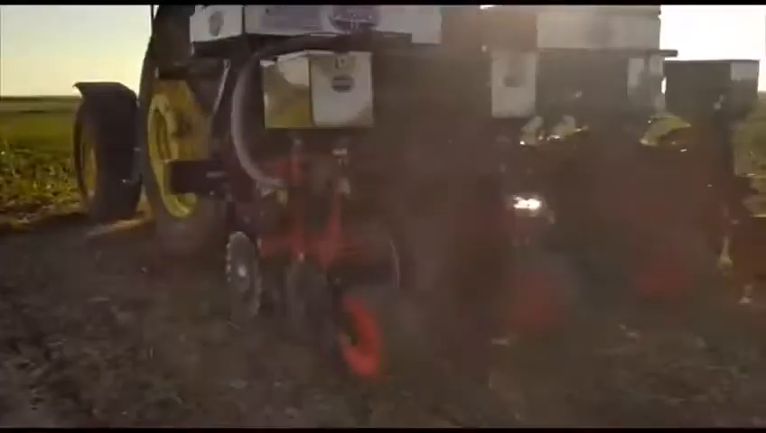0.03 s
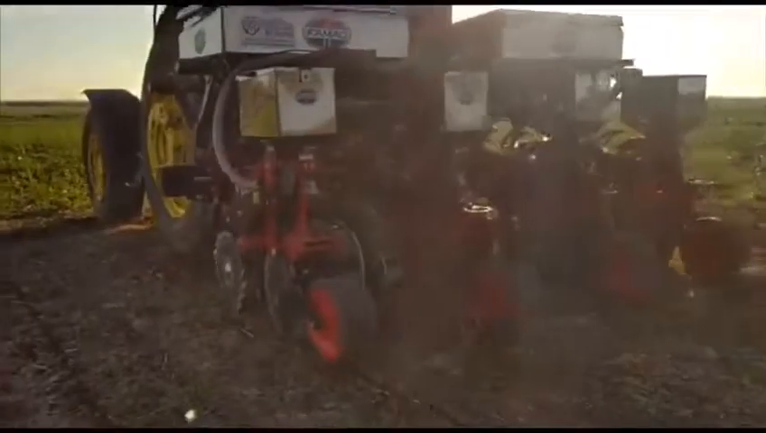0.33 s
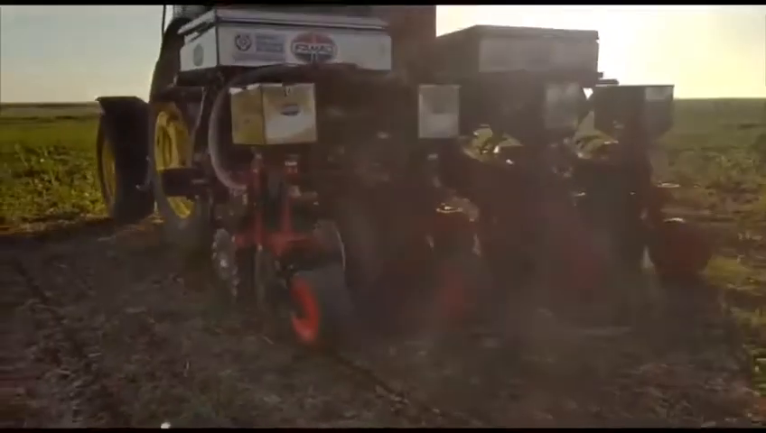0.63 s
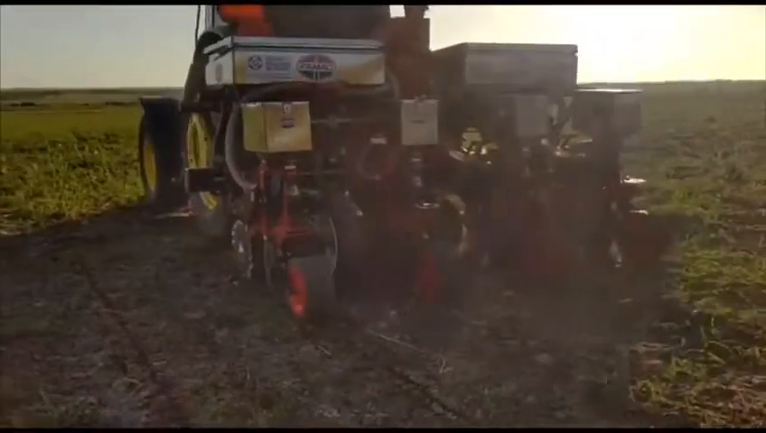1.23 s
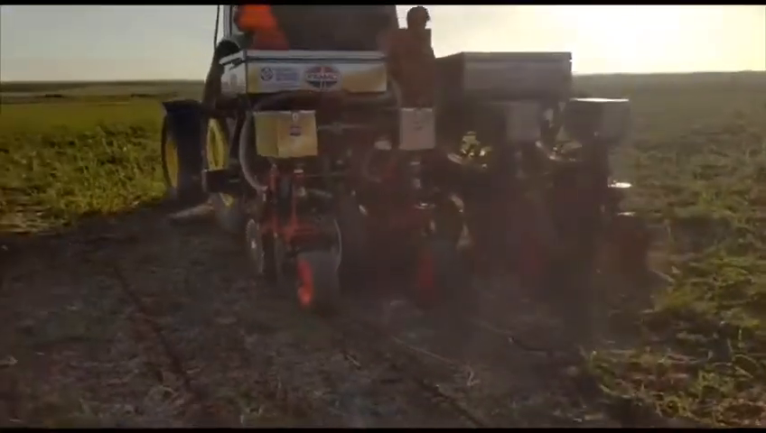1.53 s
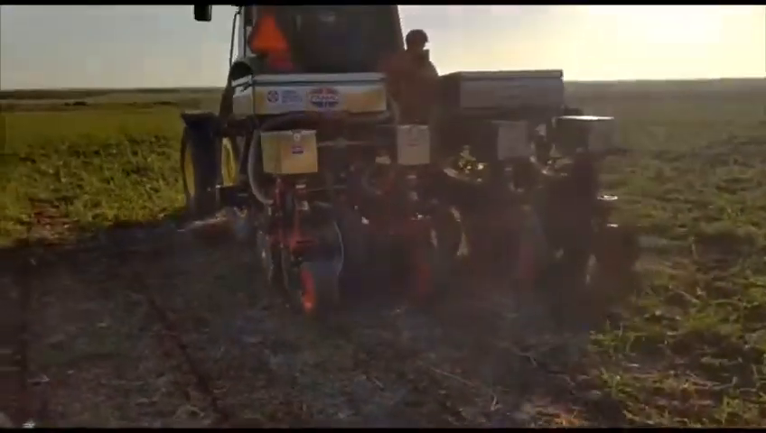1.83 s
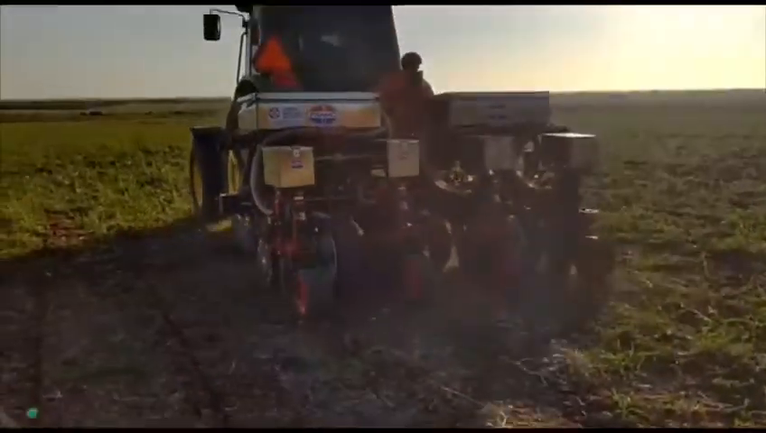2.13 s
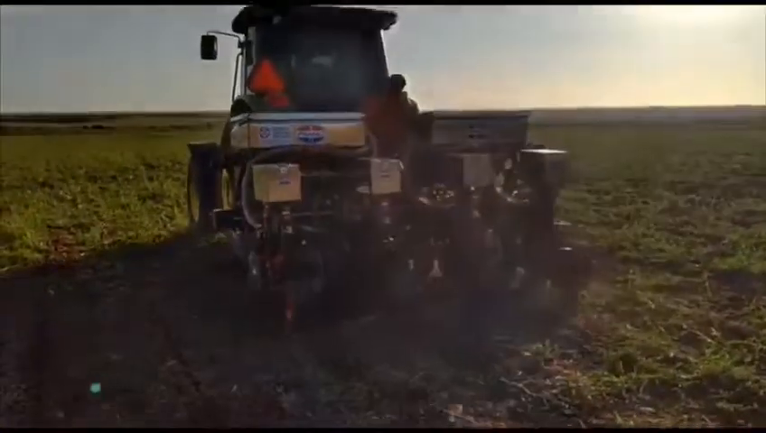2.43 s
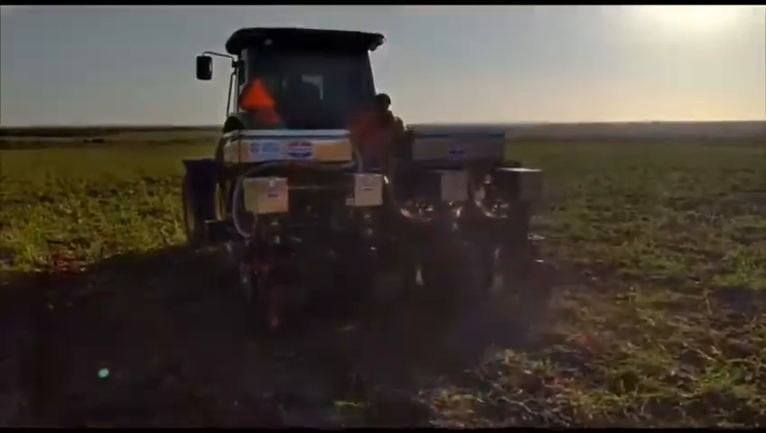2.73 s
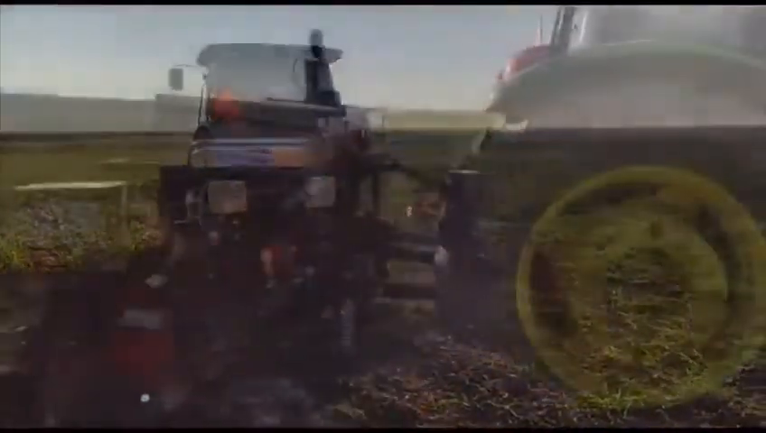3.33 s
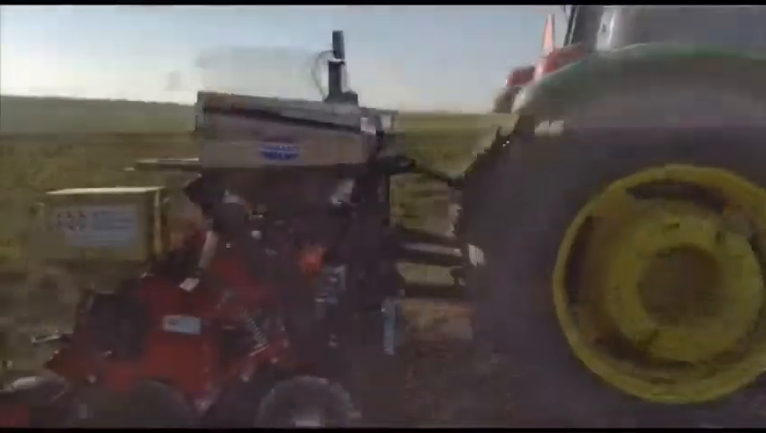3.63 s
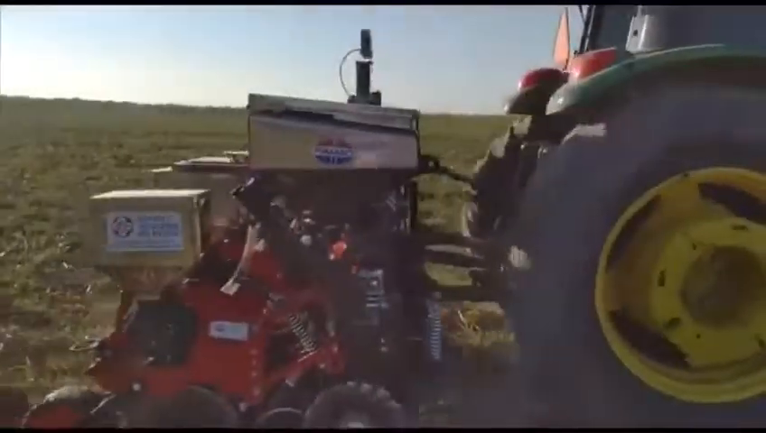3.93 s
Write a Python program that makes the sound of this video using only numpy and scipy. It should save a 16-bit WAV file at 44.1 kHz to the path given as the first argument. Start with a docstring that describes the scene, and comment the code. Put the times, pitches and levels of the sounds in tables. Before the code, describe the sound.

A seed planter's fan sings one strong tone as the tractor draws away, with engine drone, soil hiss and low wind puffs on the microphone. Late on, a closer, slightly higher fan fades in, the two tones briefly beating.

```python
"""Tractor and seed planter on a dry field

The planter draws away, its fan singing one strong blade tone over rushing air, the diesel's drone and
the hiss of soil. Wind puffs on the microphone. Near the end the sound dissolves into a second, closer
pass with a slightly higher fan; the two tones beat while they overlap."""
import sys
import numpy as np
from scipy import signal
from scipy.fft import rfft, irfft
from scipy.io import wavfile
from scipy.ndimage import uniform_filter1d

SR = 44100
rng = np.random.default_rng(int(sys.argv[2]) if len(sys.argv) > 2 else 0)


def to_wav(s):
    """Save 16-bit WAV."""
    ch = np.atleast_2d(s).T  # columns
    pcm = np.round(np.clip(ch, -1, 1) * 32767)  # PCM
    wavfile.write(sys.argv[1], SR, pcm.astype(np.int16))


N = 176400
T = np.arange(N) / SR
HZ = np.fft.rfftfreq(N, 1 / SR)


def amp(db):
    """dB to gain."""
    return 10 ** (np.asarray(db) / 20)


def unit(x):
    """Scale to rms 1."""
    return x / np.sqrt(np.mean(x ** 2) + 1e-20)


def at_hz(points, hz):
    """Interpolate a spectrum on a log-frequency axis."""
    f, value = np.transpose(points)
    return np.interp(np.log(hz + 1), np.log(f), value)


def at_time(rows, t):
    """Interpolate each column of a timeline."""
    times, *columns = np.transpose(rows)
    return [np.interp(t, times, column) for column in columns]


def wander(rate_hz):
    """Smooth random drift, rms 1, rolled off above rate_hz."""
    rolloff = np.sqrt((1 + HZ / 8) * (1 + (HZ / rate_hz) ** 6))
    return unit(irfft(rfft(rng.standard_normal(N)) * (HZ > .4) / rolloff, N))


def fan(timeline, harmonics_db, side_step_rad, waver_hz=1.32, flutter_hz=35, drift_rad=.6):
    """Blade harmonics flutter in turbulent air, each from its own drifting direction; mid, side."""
    blade_hz, level_db = at_time(timeline, T)
    phase = 2 * np.pi * np.cumsum(blade_hz + waver_hz * wander(flutter_hz)) / SR
    tone = 0
    for k, db in enumerate(harmonics_db, 1):
        flutter_db = (0.96 if k == 1 else 3) * wander(flutter_hz)
        side_rad = side_step_rad * (k - 1) + drift_rad * wander(4)
        gain = amp(level_db + db) * unit(amp(flutter_db))
        tone = tone + gain * np.cos([k * phase, k * phase + side_rad])
    return np.sqrt(2) * tone


def rush(spectrum, band_levels=None, patch_db=1.3, lump_db=2.8, flicker_db=0.78, gust_hz=26):
    """Turbulent noise in drifting patches over a lumpy rumble, ringing in the housing; mid, side."""
    # centres of the bands in band_levels: f/Hz
    bands_hz = [520, 1300, 3400, 8000]
    # fan housing and air hose resonances: f/Hz, width/Hz, lift/dB
    resonances = [(417, 22, 2.5), (540, 49, 2), (1426, 60, 3), (3384, 60, 4)]
    t = np.arange(N // 256 + 5) * 256 / SR
    hz = np.fft.rfftfreq(1024, 1 / SR)
    patches = uniform_filter1d(rng.standard_normal((len(t), len(hz))), size=7, axis=0)
    field_db = patch_db * unit(uniform_filter1d(patches, size=12, axis=1))
    field_db += lump_db * np.outer(np.interp(t, T, wander(10)), hz < 110)
    field_db += flicker_db * np.outer(np.interp(t, T, wander(gust_hz)), hz > 4970)
    if band_levels:
        for level_db, band in zip(at_time(band_levels, t), np.eye(len(bands_hz))):
            field_db += np.outer(level_db, at_hz(list(zip(bands_hz, band)), hz))
    real, imag = rng.standard_normal((2, 2, len(hz), len(t)))
    _, noise = signal.istft((real + 1j * imag) * amp(field_db.T), nperseg=1024, noverlap=768)
    swell_db = 0.81 * wander(gust_hz)
    turbulence = unit(noise[:, :N]) * amp(swell_db)
    ring_db = sum(db / (1 + (2 * (HZ - centre) / width) ** 2) for centre, width, db in resonances)
    return irfft(rfft(turbulence) * amp(at_hz(spectrum, HZ) + ring_db), N) * np.sqrt(SR / 2)


def diesel(waver=0.0062, waver_rate_hz=5.8, side_gain=0.18):
    """Engine drone of wavering low lines; mid, side."""
    # a beating pair and weaker lines: f/Hz, level/dB
    lines = [(88, -41), (221.5, -39), (226.1, -35.5), (533, -43)]
    drone = 0
    for hz, db in lines:
        line_hz = hz * (1 + waver * wander(waver_rate_hz))
        drone = drone + amp(db) * np.cos(2 * np.pi * np.cumsum(line_hz) / SR)
    return np.sqrt(2) * np.array([drone, side_gain * drone])


def departing_pass():
    """Fan, rush and diesel of the machine drawing off; mid, side."""
    # blade tone: t/s, f/Hz, level/dB
    blade_tone = [(0, 921.4, -14.5), (.4, 919, -13), (1.0, 922, -12), (1.17, 921, -12.5),
                  (1.23, 918, -10.5), (1.4, 921, -10), (1.5, 919, -13.5), (1.58, 922.4, -10.5),
                  (2.1, 921, -10.6), (2.42, 923.6, -10), (2.6, 921, -11.5), (2.72, 917, -10.5),
                  (2.88, 920, -10.8), (2.98, 922.6, -13), (3.42, 920.3, -12), (3.65, 921, -20)]
    # air, engine and soil noise: f/Hz, density/(dB per Hz)
    spectrum = [(25, -65), (55, -55.5), (100, -52), (180, -52), (295, -59.5), (420, -48.5), (540, -46.5),
                (650, -56), (870, -46), (1080, -53), (1480, -51.5), (1800, -57.5), (2600, -63),
                (3100, -57.5), (3380, -55), (3580, -64.5), (4300, -61.5), (4900, -67.5), (5500, -71.5),
                (7300, -70.5), (9000, -81), (11200, -72.5), (12000, -84.5)]
    # receding noise: t/s, growl/dB, rush/dB, rasp/dB, hiss/dB
    band_levels = [(0, 1.5, 2.5, 2.5, 5.5), (.3, 1.5, 2.5, 4, 3.5), (.85, 0.5, 0.5, 0, -1),
                   (1.3, 1, 1, 0, 2.5), (1.7, -1.5, 1, 1.5, 1.5), (2.0, 0, -1, -.5, 1.5),
                   (2.35, 1, -1, -1.5, -2), (2.7, -.5, -2.5, -1.5, -3), (3.0, 0, -3.5, -3, -5),
                   (3.5, -1.5, -6, -2, 0)]
    harmonics_db = [-0.5, -24, -29, -29.5, -44, -47, -47.5]
    return fan(blade_tone, harmonics_db, side_step_rad=2.7) + rush(spectrum, band_levels) + diesel()


def swells(rows):
    """Envelope of short Gaussian swells."""
    return sum(amp(db) * np.exp(-2 * ((T - at_s) / length_s) ** 2) for at_s, length_s, db in rows)


def soil(grains_per_s=2500, grit_db=-53, size_spread_db=5.5):
    """Dry grains tick on the openers, now and then in a dense spurt; mid, side."""
    # spurts: t/s, length/s, level/dB
    spurts = [(0.05, 0.037, -29.5), (2.02, 0.023, -43), (3.12, .05, -46), (3.455, 0.031, -33)]
    # grain spectrum: f/Hz, gain/dB
    colour = [(2000, -17), (4500, -6), (7500, 6), (11500, 7), (13000, -18)]
    sizes = amp(size_spread_db * np.minimum(rng.exponential(1, N), 4))
    strikes = rng.random(N) < grains_per_s / SR
    grains = unit(rng.standard_normal((2, N)) * sizes * strikes)
    impacts = amp(grit_db) * grains + swells(spurts) * rng.standard_normal((2, N))
    return irfft(rfft(impacts) * unit(amp(at_hz(colour, HZ))), N)


def wind():
    """Low puffs of wind on the microphone; mid, side."""
    # puffs: t/s, length/s, level/dB
    puffs = [(1.05, .03, -33), (1.33, 0.055, -27), (1.6, 0.045, -26), (2.18, .04, -31), (2.8, .05, -36),
             (3.12, .06, -30), (3.9, .04, -32)]
    # puff spectrum: f/Hz, gain/dB
    colour = [(20, -12), (50, 2), (100, 1), (160, -6), (400, -52), (1000, -89)]
    rumble = irfft(rfft(rng.standard_normal((2, N))) * amp(at_hz(colour, HZ)), N)
    return swells(puffs) * unit(rumble)


def close_pass():
    """Slightly higher fan and its rush, close by; mid, side."""
    # blade tone: t/s, f/Hz, level/dB
    blade_tone = [(3.1, 945.7, -16), (3.22, 947, -13.5), (3.3, 946.5, -14), (3.42, 945.3, -14.5),
                  (3.5, 947, -15), (3.7, 942.6, -13), (3.82, 944.4, -13), (4, 943, -14)]
    # air, engine and soil noise: f/Hz, density/(dB per Hz)
    spectrum = [(25, -67), (80, -50.5), (150, -55), (225, -53.5), (310, -64), (470, -52.5), (640, -54.5),
                (1020, -49.5), (1150, -53.5), (1440, -48), (1850, -63.5), (2500, -68.5), (3100, -58.5),
                (3700, -66.5), (5000, -71), (9000, -73), (10800, -69), (12000, -74)]
    harmonics_db = [1.5, -23, -18.5, -44, -38, -49]
    return fan(blade_tone, harmonics_db, side_step_rad=1.7) + rush(spectrum)


def stereo(mid, side, swing_period_hz=2345, swing_floor=0.013, max_coherence=0.58):
    """Mid, side to left, right; above the lows the width swings with frequency."""
    # width in the lows: f/Hz, side minus mid/dB
    low_width = [(40, 25.5), (100, 10.5), (200, -0.5), (300, 0.5), (420, -10.5), (540, -18.5), (680, -9.5),
                 (920, -21.5), (1150, -44)]
    # width swing: f/Hz, steepness
    steepness = [(1200, 1.17), (3500, 2.27), (6000, 1.26), (9000, 0.51), (12000, 0.3)]
    # balance: f/Hz, left minus right/dB
    balance = [(60, -1), (110, 1.5), (200, 4.5), (350, 4.5), (640, -0.5), (920, 0.24), (1500, -3),
               (2300, 0), (3700, 1), (5400, 1), (7000, -.5), (11500, -2.5)]
    angle = 2 * np.pi * HZ / swing_period_hz
    comb = (1 + np.cos(angle) + swing_floor) / (1 - np.cos(angle) + swing_floor)
    swing = comb ** (at_hz(steepness, HZ) / 2)
    width = np.where(HZ < swing_period_hz / 2, amp(at_hz(low_width, HZ)), swing)
    coherence = max_coherence * np.sin(angle)
    mid_bins = rfft(mid)
    # the side partly follows the mid, a quarter cycle apart
    side_bins = width * (np.sqrt(1 - coherence ** 2) * rfft(side) - 1j * coherence * mid_bins)
    lean = amp(at_hz(balance, HZ) / 2)
    left_right = np.array([(mid_bins + side_bins) * lean, (mid_bins - side_bins) / lean])
    return irfft(left_right / np.sqrt(1 + width ** 2), N)


def scene(dissolve_at_s=2.966, dissolve_s=0.87):
    """The departing pass dissolves into the close one, with soil and wind over both."""
    blend = np.clip((T - dissolve_at_s) / dissolve_s, 0, 1)
    machine = (1 - blend) * departing_pass() + blend * close_pass()
    return stereo(*(machine + soil() + wind()))


def record(dry, knee=.7, ceiling=.92, cutoff_hz=11950):
    """Soft clip, then low-pass."""
    linear = np.clip(dry, -knee, knee)
    rounded = linear + (ceiling - knee) * np.tanh((dry - linear) / (ceiling - knee))
    lowpass = signal.firwin(511, cutoff_hz, window=("kaiser", 9), fs=SR)
    return signal.oaconvolve(rounded, lowpass[None], "same")


dry = scene()
out = record(dry)
to_wav(out)
```